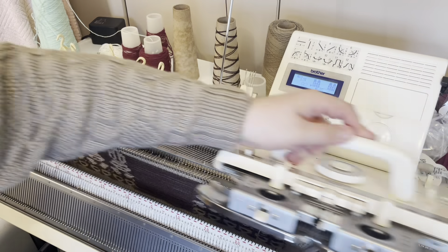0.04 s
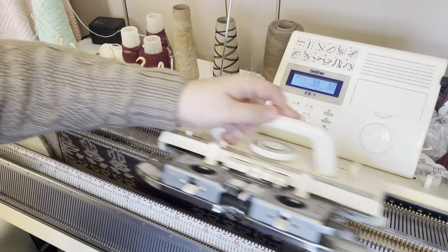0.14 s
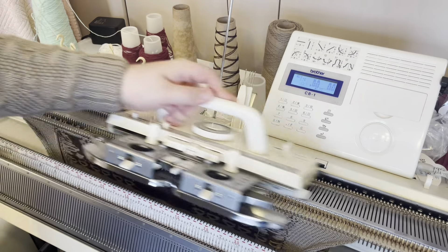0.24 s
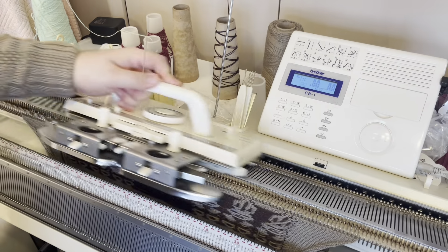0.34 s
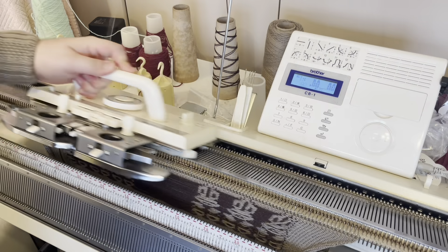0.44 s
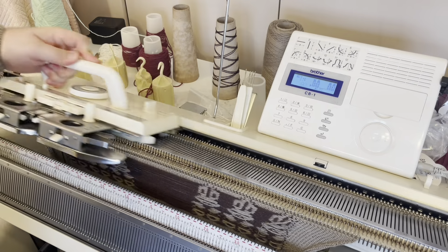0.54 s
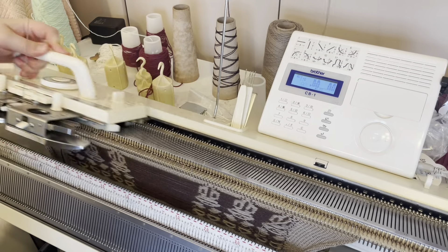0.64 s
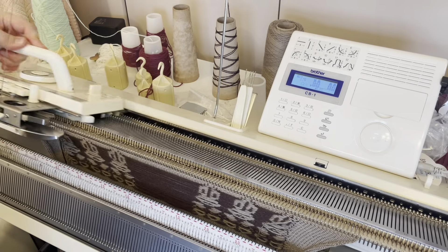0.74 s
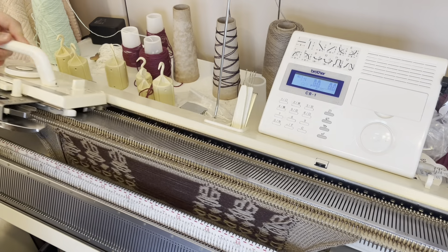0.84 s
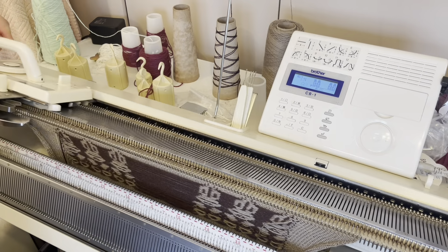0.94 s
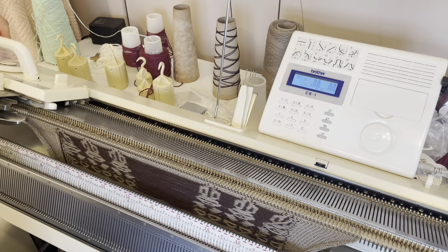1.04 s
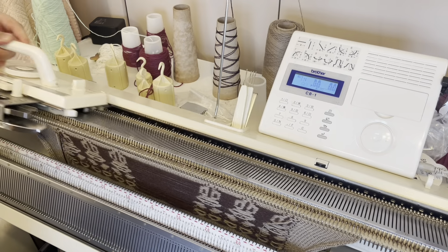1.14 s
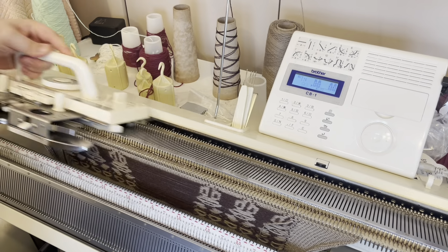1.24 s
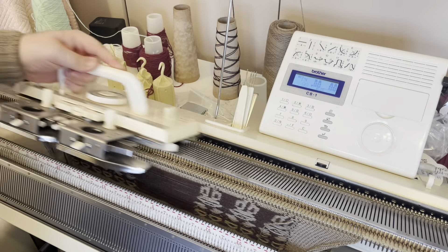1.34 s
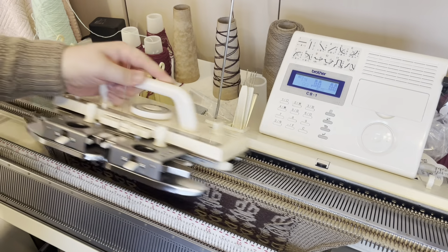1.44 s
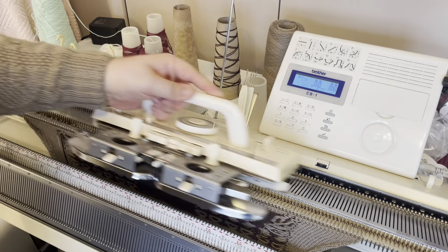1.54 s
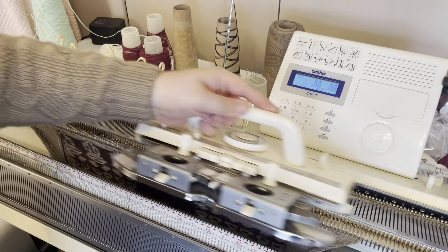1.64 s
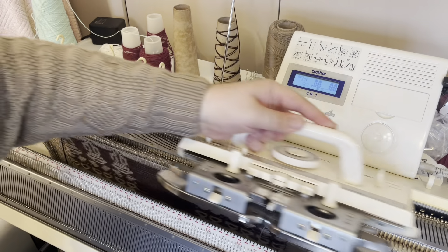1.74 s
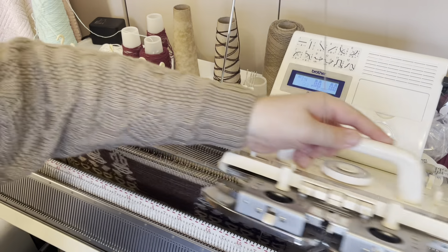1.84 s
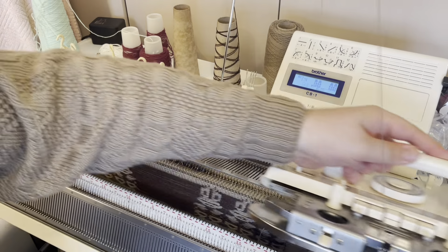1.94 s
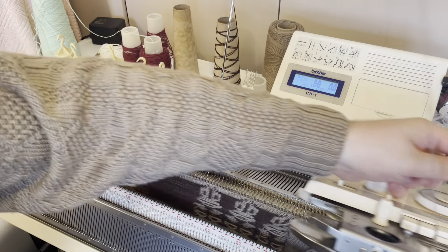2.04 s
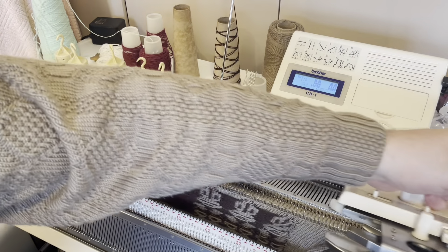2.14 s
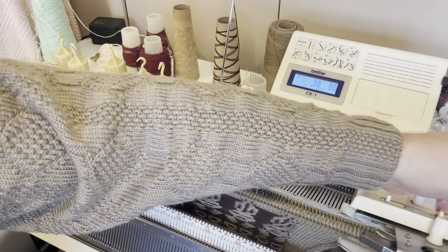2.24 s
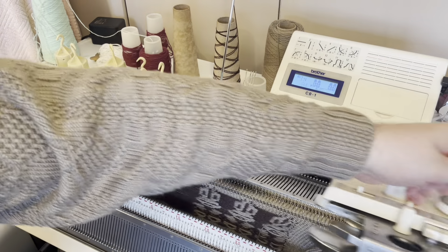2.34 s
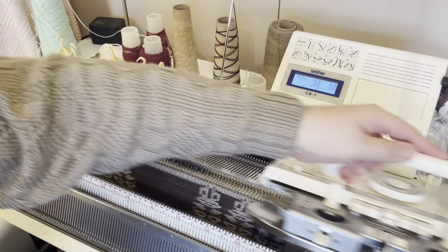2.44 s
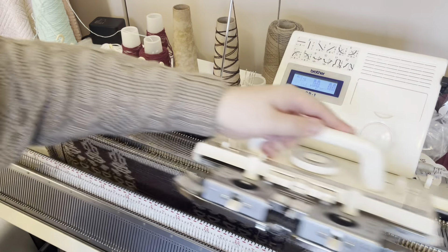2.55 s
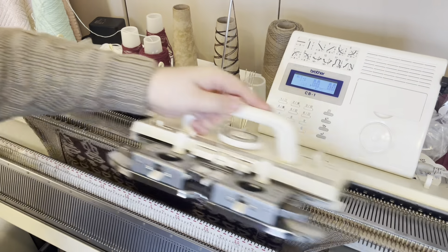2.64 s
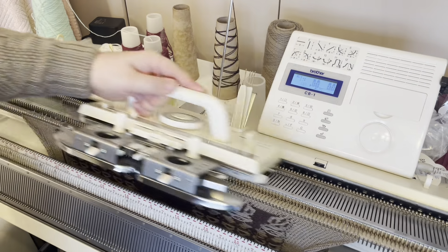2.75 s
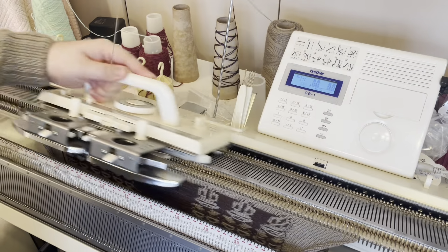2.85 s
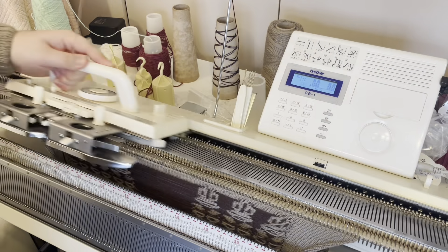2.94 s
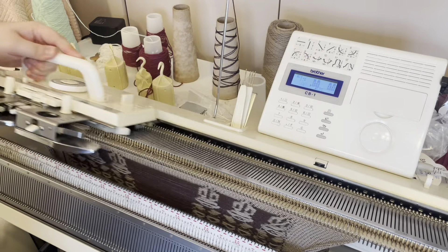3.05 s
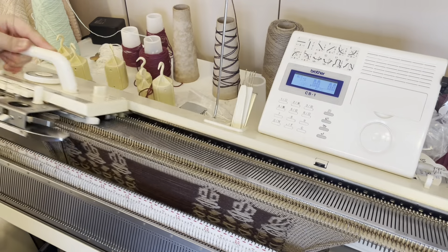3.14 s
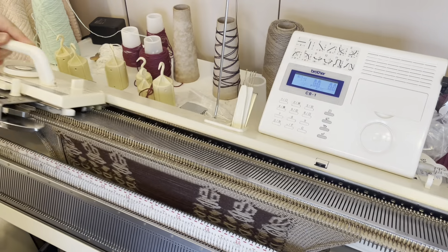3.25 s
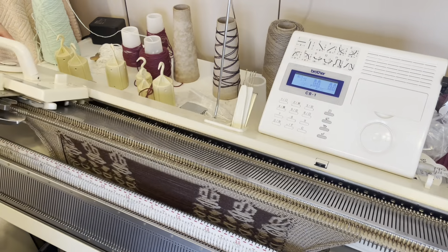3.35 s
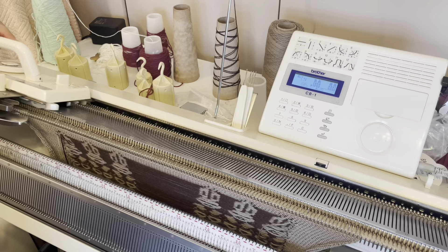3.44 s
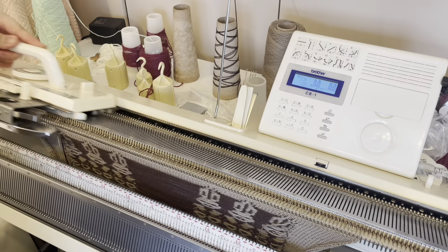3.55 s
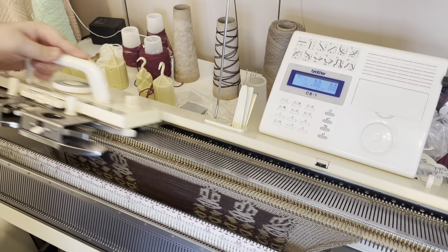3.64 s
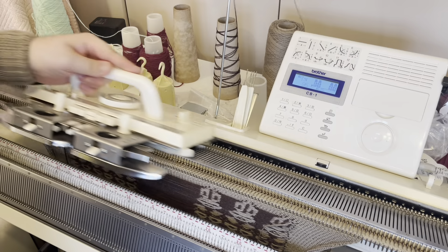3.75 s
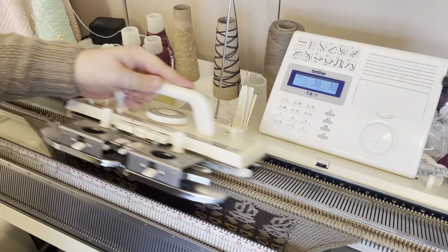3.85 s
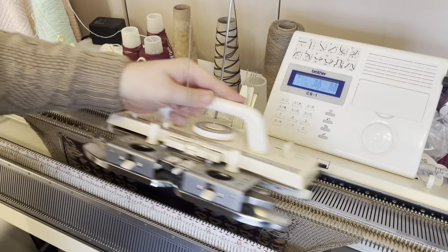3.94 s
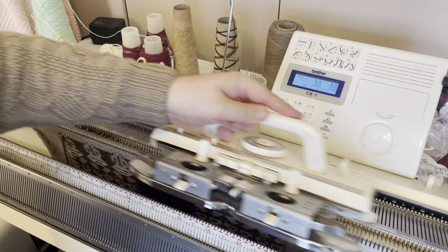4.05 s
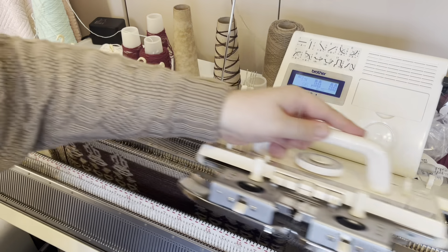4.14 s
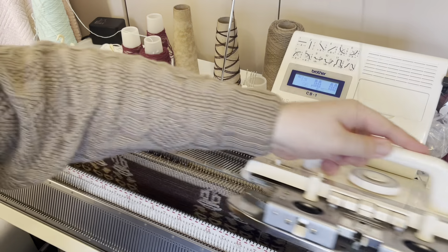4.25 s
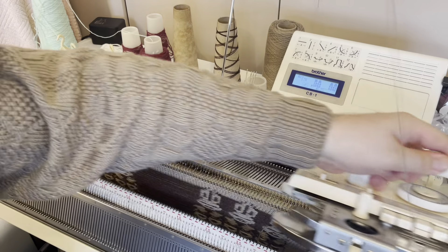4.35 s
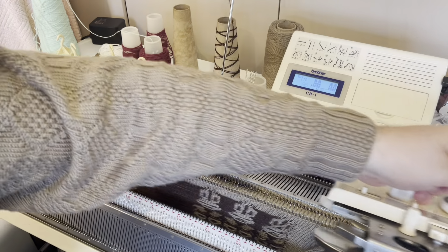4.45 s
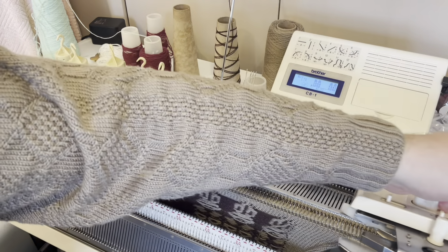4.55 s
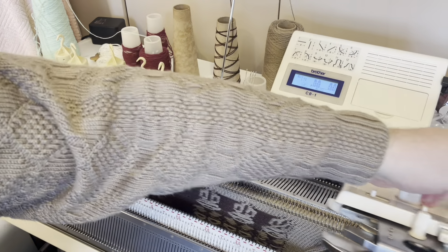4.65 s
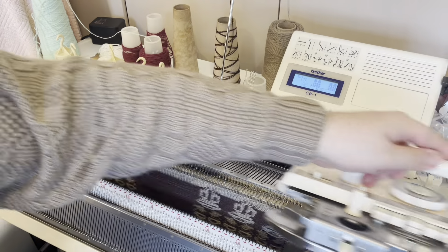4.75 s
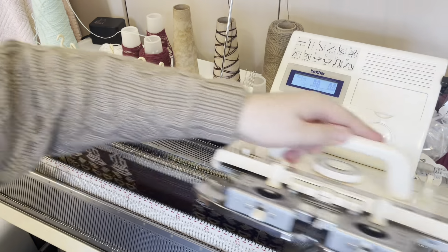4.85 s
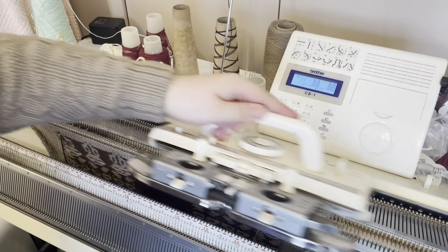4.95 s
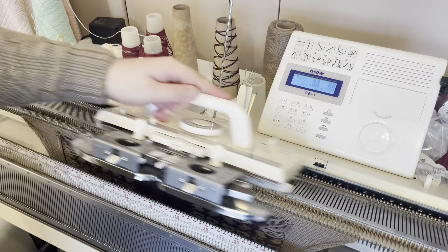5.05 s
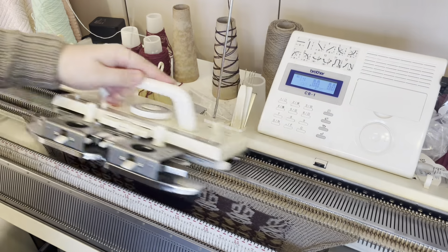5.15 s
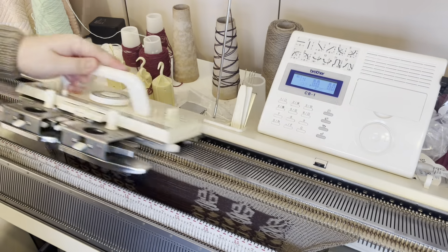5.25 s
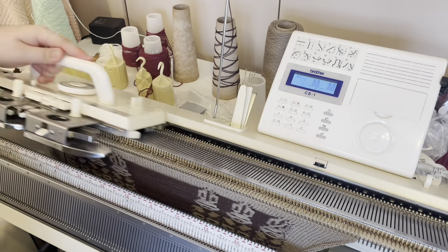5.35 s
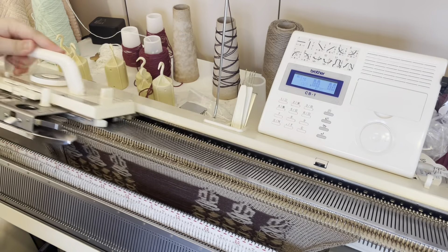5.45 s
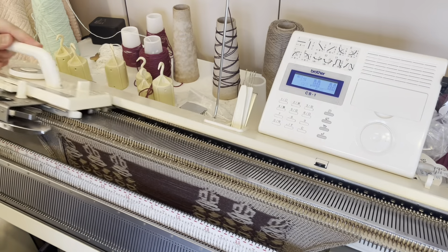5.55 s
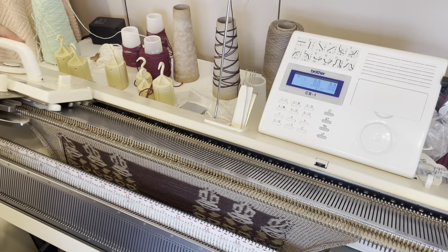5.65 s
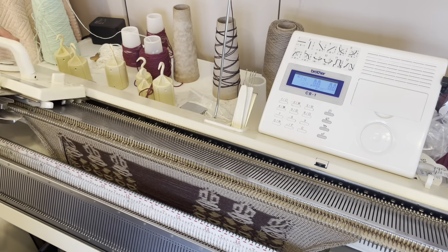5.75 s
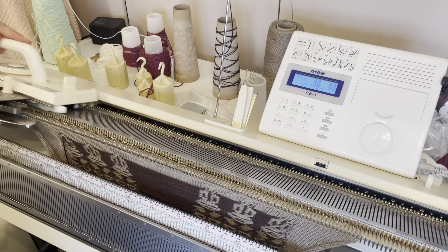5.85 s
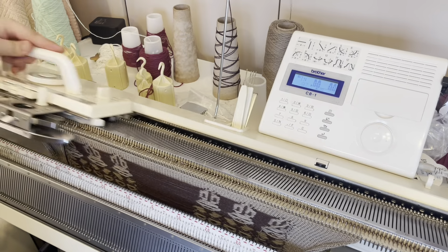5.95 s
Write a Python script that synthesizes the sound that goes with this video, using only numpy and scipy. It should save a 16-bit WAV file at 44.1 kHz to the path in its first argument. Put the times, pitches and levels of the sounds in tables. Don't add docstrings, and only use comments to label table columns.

```python
import sys
import numpy as np
from scipy import signal
from scipy.fft import rfft, irfft, next_fast_len
from scipy.io import wavfile
from scipy.ndimage import uniform_filter1d

SR = 44100
rng = np.random.default_rng(int(sys.argv[2]) if len(sys.argv) > 2 else 0)


def invert_db(x):
    u = np.asarray(x, float) / 20
    return 10 ** u


def inscribe(sig):
    pcm = np.round(np.clip(np.atleast_2d(sig).T, -1, 1) * 32767)
    wavfile.write(sys.argv[1], SR, pcm.astype(np.int16))


N = 265041

# [t/s, level/dB]
PUSH = [
    [(0, -21.5), (.08, -22), (.3, -24), (.6, -28), (.68, -31), (.75, -39.5), (.84, -49.5), (.96, -64)],
    [(1.165, -45.5), (1.185, -34), (1.25, -24), (1.31, -24.5), (1.71, -27), (1.85, -29.5), (1.96, -32),
     (2.05, -44), (2.16, -60)],
    [(2.37, -45.5), (2.46, -28), (2.52, -21), (2.65, -21.5), (2.73, -29), (2.87, -28), (3.15, -35),
     (3.25, -45.5), (3.33, -61)],
    [(3.49, -48), (3.535, -52.5), (3.56, -35.5), (3.61, -26), (3.7, -22.5), (3.95, -26.5), (4.2, -28),
     (4.38, -38.5), (4.45, -54.5)],
    [(4.69, -54), (4.725, -36.5), (4.79, -28), (4.9, -21), (5.0, -23), (5.27, -27), (5.49, -33),
     (5.55, -44), (5.67, -62.5)],
    [(5.822, -67), (5.84, -55), (5.9, -49.5), (5.93, -32.5), (6.01, -26)],
]
# [halt t/s, creeping off t/s, rest level/dB, creep level/dB]
TURNS = [(1.015, 1.061, -78, -63.5), (2.22, 2.325, -68.5, -56), (3.38, 3.451, -68.5, -62),
         (4.577, 4.612, -67, -63), (5.72, 5.765, -75.5, -68)]
# [t/s, needle rate f/Hz, bite of the cams level/dB]
STROKES = [
    [(0, 179, -39), (.09, 199, -40.5), (.27, 210, -40.5), (.36, 188, -48), (.54, 156, -43), (.75, 140, -53)],
    [(1.2, 200, -50), (1.29, 232, -43.5), (1.47, 183, -43.5), (1.56, 186, -41), (1.83, 154, -43),
     (2.0, 140, -47.5)],
    [(2.42, 205, -50.5), (2.55, 236, -36), (2.68, 252, -40), (2.78, 199, -48), (2.96, 163, -51.5),
     (3.15, 146, -48.5)],
    [(3.58, 208, -50), (3.67, 230, -40.5), (3.85, 187, -43.5), (3.94, 183, -44.5), (4.12, 168, -41.5),
     (4.35, 140, -46)],
    [(4.75, 170, -51), (4.84, 239, -39), (5.02, 227, -39.5), (5.2, 187, -48), (5.29, 167, -50.5),
     (5.5, 133, -48.5)],
]
# [f/Hz, level/dB]
BODY_RESPONSE = [(135, -32), (165, 2), (182, 5), (200, -7.5), (228, -8), (270, -10.5), (370, -9),
                 (450, -2.5), (600, -1.5), (740, -9), (960, -0.5), (1250, -10), (1450, -18), (1670, -3),
                 (2100, -15)]

# [f/Hz, level/dB]
HISS = [(5500, -31), (6800, -13.5), (7900, -5), (8800, -7), (10000, -0.5), (11200, -3), (11900, -6.5),
        (12600, -17), (13500, -28), (14250, -46), (14450, -75)]
CLATTER = [(600, -43), (950, -4.5), (1400, -16.5), (2000, -11), (2700, -3), (3250, -3), (3800, -4),
           (5200, -1.5), (6600, -4), (7400, -11.5), (8500, -7)]
RUMBLE = [(130, -16), (200, -4.5), (330, -12.5), (450, 0), (650, 0.5), (830, -3.5), (1050, -7.5),
          (1400, -13), (2000, -11), (2800, -28)]
TABLE = [(20, -36), (40, -19), (65, -17), (95, -2), (130, -20), (170, -0.5), (240, -58)]
# [f/Hz, level/dB]
GLINT = [(14300, -50), (14550, 0), (15750, -1), (15880, -60)]
# [f/Hz, bandwidth/Hz, level/dB]
PLATES = [(410, 18, -58.5), (762, 20, -56.5), (1070, 33, -49), (1680, 130, -71), (3220, 45, -47.5),
          (5130, 29, -47.5), (9030, 190, -30.5), (11140, 280, -27.5)]
# [f/Hz, level/dB]
RUSH_TOP = [(12800, 0), (14300, -4), (14600, -60)]
# [f/Hz, level/dB]
ROOM_TONE = [(25, -21), (60, -23), (100, 9), (220, 16.5), (600, 9), (850, -18), (1500, -24), (4000, -26),
             (12000, -30), (13000, -52)]

# [t/s, table level/dB, carriage level/dB]
KNOCKS = [(0.069, -30, -26.5), (0.786, -40, -38), (1.307, -34.5, -40), (2.039, -43, -37),
          (2.095, -43, -37.5), (2.385, -41, -43), (2.553, -36, -35), (3.207, -38, -36), (3.694, -39, -41),
          (4.42, -44, -40.5), (4.899, -41, -31.5), (5.536, -40, -36.5)]
# [delay t/s, level/dB]
BUMPS = [(-.022, -8), (0, -1), (.019, -6), (.041, -11.5)]
# [f/Hz, level/dB, decay by 60 dB t/s]
KNOCK_MODES = [(94, -16, 0.23), (132, -5, 0.15), (181.3, 3, 0.22), (300, 6, 0.025), (513, 6, 0.056),
               (606, -2, 0.028), (790, -43, .04)]
# [t/s, peak level/dB, pitch f/Hz, dull tap level/dB]
CLICKS = [(0.812, -30, 7696, -59), (0.949, -44, 6010, -67), (1.064, -61, 4376, -43.5),
          (1.115, -44, 8970, -51), (1.1765, -30, 8184, -32), (2.0788, -26.5, 3250, -33),
          (2.27, -59, 2520, -39.5), (2.3367, -40, 9140, -55), (2.3725, -24.5, 3280, -32.5),
          (3.3038, -27.5, 9700, -56), (3.4404, -67, 4380, -42.5), (3.453, -45, 6800, -66),
          (3.485, -42, 8970, -60), (3.5475, -28, 8150, -42), (4.4202, -27.5, 5000, -32),
          (4.469, -48, 8900, -55), (4.49, -41, 6940, -55), (4.608, -58, 9220, -40.5),
          (4.7032, -25.5, 3500, -30.5), (5.77, -59, 4430, -43.5), (5.8334, -40.5, 6400, -66),
          (5.9171, -29, 8500, -45)]
# [f/Hz, level/dB]
CLICK_TOP = [(13000, 0), (14500, -16)]
# [t/s, duration t/s, level/dB]
RING = [(.82, .34, -63), (2.0, 0.2496, -61), (3.24, 0.33, -58), (4.4, 0.19, -61), (5.548, .29, -62)]
# [f/Hz, level/dB]
BED_MODES = [(4310, -11), (4340, -8), (4352, -5), (4374, 3), (4392, -8), (4408, -2), (11750, -5)]
# [f/Hz, left-right likeness, phase lead of the right/rad, left over
# right level/dB]
PORTS = [(100, .99, 0, 0), (250, .93, 0, .5), (600, .62, 0, .3), (1500, .7, .2, 1.0), (3000, .56, -.7, 2.4),
         (4000, .68, -.3, 1.5), (5300, .48, -.5, 3.0), (6300, .68, -.2, 2.2), (7100, .55, -.45, 5.0),
         (7700, .85, -.9, 1.5), (8500, .96, 0, .3), (10220, .998, 3.14, 0), (11780, .999, 6.2, 0),
         (12250, .999, 6.4, 0), (13250, .999, 9.3, 0), (14250, .999, 9.5, 0), (14650, .999, 12.56, 0)]

FULL_PUSH_DB, SET_OFF_S = -24, 0.012
JERK_DB, JERK_GROWS, JERKS_PER_S = 0.35, 0.05, 30
# (level/dB at full push, share of the swing, lag t/s)
CLATTER_LAW, RUMBLE_LAW, TABLE_LAW = (-28.5, 0.86, 0.011), (-35, 0.62, 0.04), (-58.5, 0.29, 0.077)
RUMBLE_SHUDDER_DB, TABLE_SHUDDER_DB, SHUDDER_T60_S = -6.5, -11, 0.083
HUM_DB, HUM_FOLLOWS = -44.5, 0.44
BRIGHT_DB_PER_RATE, USUAL_RATE = 0.06, 203
CLICK_T60_S, RING_FADE_DB_PER_S = 0.024, 36
ROOM_DB, ROOM_T60_S = -61, 0.45


def rms_one(x):
    return x / np.sqrt(np.mean(x ** 2) + 1e-20)


def in_time(rows):
    s, *columns = np.transpose(rows)
    return [np.interp(np.arange(N) / SR, s, c) for c in columns]


def during(spans):
    t = np.arange(N) / SR
    inside = sum(1. * (t >= start) * (t < end) for start, end in spans)
    return uniform_filter1d(inside, size=2001, mode="nearest")


def shaped(x, points, column=1, gain=invert_db):
    size = next_fast_len(N + 4096)
    hz = np.maximum(np.arange(size // 2 + 1) * SR / size, 1)
    table = np.array(points)
    curve = np.interp(np.log(hz), np.log(table[:, 0]), table[:, column])
    return irfft(rfft(x, size) * gain(curve), size)[..., :N]


def flutter(rate):
    r = np.exp(-2 * np.pi * rate / SR)
    slow = signal.lfilter([1], [1, -2 * r, r * r], rng.standard_normal(N + 8000))
    return rms_one(slow[8000:])


def ring(force, hz, t60):
    r, w = invert_db(-60 / (t60 * SR)), 2 * np.pi * hz / SR
    return signal.lfilter([0, np.sin(w)], [1, -2 * r * np.cos(w), r * r], force + 1e-18)


def resonance(force, hz, width):
    r = np.exp(-np.pi * width / SR)
    poles = [1, -2 * r * np.cos(2 * np.pi * hz / SR), r * r]
    return signal.lfilter([(1 - r * r) / 2, 0, (r * r - 1) / 2], poles, force)


def push():
    curve = [row for stroke in PUSH for row in stroke]
    for halt, off, rest, creep in TURNS:
        curve += [(halt, rest), (off, rest), (off + SET_OFF_S, creep)]
    push_db = in_time(sorted(curve))[0] - FULL_PUSH_DB
    jerk_db = JERK_DB + JERK_GROWS * np.clip(-push_db, 0, 35)
    return push_db + jerk_db * flutter(JERKS_PER_S)


def follow(push_db, law):
    level_db, share, lag_s = law
    r = np.exp(-1 / (max(lag_s, .001) * SR))
    gain = invert_db(level_db + share * push_db)
    return signal.lfilter([1 - r], [1, -r], gain, zi=[r * gain[0]])[0]


def shudder(column):
    blows = np.zeros(N)
    blows[[round(row[0] * SR) for row in KNOCKS]] = invert_db(np.array(KNOCKS)[:, column])
    return signal.lfilter([1], [1, -invert_db(-60 / (SHUDDER_T60_S * SR))], blows + 1e-18)


def hum(push_db):
    per_s, bite_db = in_time([row for stroke in STROKES for row in stroke])
    lowest_db = HUM_DB + HUM_FOLLOWS * push_db
    higher_db = bite_db - 2.0 + BRIGHT_DB_PER_RATE * (per_s - USUAL_RATE)
    levels_db = lowest_db, bite_db, higher_db
    needle = np.cumsum(per_s * (1 + 0.00385 * flutter(21.1))) / SR
    body, tone = np.array(BODY_RESPONSE), 0
    for k in range(1, 10):
        body_db = np.interp(np.log(k * per_s), np.log(body[:, 0]), body[:, 1])
        db = body_db + levels_db[min(k // 2, 2)]
        waver = invert_db(db + (1.5 if k == 1 else 5) * flutter(12))
        tone = tone + np.sqrt(2) * waver * np.sin(2 * np.pi * (k * needle + rng.random()))
    strokes = during([(rows[0][0], rows[-1][0]) for rows in STROKES])
    return needle, strokes * tone


def contacts(needle, per_s, spread_db, beat, flutter_db):
    bunch = 1 + np.clip(beat, 0, 1) * np.cos(2 * np.pi * needle)
    bunch = bunch * invert_db(flutter_db * (flutter(64) + flutter(220)))
    hit = rng.random((3, N)) < per_s / SR
    sizes = invert_db(spread_db * np.minimum(rng.exponential(1, (3, N)), 4))
    sizes = sizes * rng.choice([-1, 1], (3, N))
    return bunch * (rms_one(hit * sizes) + 1.07 * rng.standard_normal((3, N)))


def top_glint(fine, push_db):
    glint = 0
    for hz in (14550, 14800, 15050, 15350, 15700):
        on = uniform_filter1d(1. * (flutter(7) + push_db / 22 > .35), size=400)
        tone = rms_one(resonance(resonance(fine[0], hz, 200), hz, 200))
        glint = glint + invert_db(-51 + .6 * push_db) * on * tone
    return shaped(glint, GLINT)


def ringing_parts(coarse, clatter, hiss):
    parts = 0
    for hz, width, db in PLATES:
        drive = clatter if hz < 7000 else hiss * invert_db(-7.5)
        gain = drive * invert_db(db + 28.0 + 3.6 * flutter(6.9))
        parts = parts + gain * rms_one(resonance(coarse, hz, width))
    for hz in np.geomspace(1200, 6800, 16):
        flare = clatter * invert_db(-24 + 5.5 * flutter(9))
        parts = parts + flare * rms_one(resonance(coarse, hz, 60 + hz / 50))
    return parts


def rush(needle, push_db):
    hiss, clatter = invert_db(FULL_PUSH_DB + push_db), follow(push_db, CLATTER_LAW)
    rumble = follow(push_db, RUMBLE_LAW) + invert_db(RUMBLE_SHUDDER_DB) * shudder(column=2)
    table = follow(push_db, TABLE_LAW) + invert_db(TABLE_SHUDDER_DB) * shudder(column=1)
    fine = contacts(needle, 7000, spread_db=0.5, beat=0.024, flutter_db=0.18)
    coarse = contacts(needle, 2000, spread_db=1.0, beat=0.017, flutter_db=-0.38)
    out = hiss * invert_db(2.0) * rms_one(shaped(fine, HISS))
    out += clatter * rms_one(shaped(0.82 * fine + 0.59 * coarse, CLATTER))
    out += rumble * invert_db(-4.5) * rms_one(shaped(coarse, RUMBLE))
    out = shaped(out + ringing_parts(coarse, clatter, hiss), RUSH_TOP)
    out[0] += top_glint(fine, push_db)
    return out + table * invert_db(3.5) * rms_one(shaped(rng.standard_normal((3, N)), TABLE))


def room_tone():
    return invert_db(ROOM_DB) * rms_one(shaped(rng.standard_normal((3, N)), ROOM_TONE))


def knocks():
    rows, out = np.array(KNOCKS), np.zeros(N)
    chance = rng.standard_normal((len(rows), len(KNOCK_MODES), len(BUMPS)))
    for k, (hz, db, t60) in enumerate(KNOCK_MODES):
        struck_db = rows[:, 1 if hz < 250 else 2] + db
        blows = np.zeros(N)
        for j, (late_s, loss_db) in enumerate(BUMPS):
            at = np.round((rows[:, 0] + late_s) * SR).astype(int)
            blows[at] = invert_db(struck_db + loss_db + 2.0 * chance[:, k, j]) * (-1) ** k
        force = signal.lfilter([1], [1, -np.exp(-2.5 * hz / SR)], blows * 5 * hz / SR)
        out += ring(force, hz, t60)
    return signal.lfilter(*signal.butter(2, 70, "high", fs=SR), out)


def clicks():
    length = 8000
    out, t = np.zeros(N + length), np.arange(length) / SR
    noise = rng.standard_normal((len(CLICKS), 2, length))
    bright_fade = (1 - np.exp(-t / 0.00012)) * invert_db(-60 * t / CLICK_T60_S)
    tap_fade = (1 - np.exp(-t / 0.0081)) * invert_db(-60 * t / 0.068)
    for (s, peak_db, hz, low_db), (sharp, dull) in zip(CLICKS, noise):
        pitched = sharp + 1.5 * resonance(sharp, hz, 2500)
        bright = rms_one(signal.lfilter(*signal.butter(2, hz * .55, "high", fs=SR), pitched))
        tap = rms_one(resonance(resonance(dull, 280, 650), 320, 1150))
        snap = invert_db(peak_db + 1.5) * bright_fade * bright + invert_db(low_db + 1.5) * tap_fade * tap
        start = round(s * SR)
        out[start:start + length] += snap
    return shaped(out[:N], CLICK_TOP)


def bed_ring():
    fades = []
    for s, length, db in RING:
        fades += [(s, db), (s + length, db - RING_FADE_DB_PER_S * length)]
    level_db, = in_time(fades)
    t, modes = np.arange(N) / SR, 0
    for hz, db in BED_MODES:
        modes = modes + invert_db(db + 1.5 * flutter(5)) * np.sin(2 * np.pi * (hz * t + rng.random()))
    return during([(s, s + length) for s, length, db in RING]) * invert_db(level_db) * rms_one(modes)


def room(x):
    t = np.arange(SR // 2) / SR
    tails = rng.standard_normal((2, len(t))) * invert_db(-60 * t / ROOM_T60_S) * (t > .003)
    return signal.fftconvolve(x[None], tails / np.sqrt(np.sum(tails[0] ** 2)), axes=1)[:, :N]


def ports(direct, diffuse):
    near = shaped(direct, PORTS, column=1, gain=lambda c: np.sqrt(np.clip(c, 0, 1)))
    far = shaped(diffuse, PORTS, column=1, gain=lambda c: np.sqrt(1 - np.clip(c, 0, 1)))
    left = shaped(near, PORTS, column=2, gain=lambda p: np.exp(-.5j * p)) + far[0]
    right = shaped(near, PORTS, column=2, gain=lambda p: np.exp(.5j * p)) + far[1]
    left = shaped(left, PORTS, column=3, gain=lambda d: invert_db(d / 2))
    right = shaped(right, PORTS, column=3, gain=lambda d: invert_db(-d / 2))
    return np.array([left, right])


def scene():
    push_db = push()
    needle, tone = hum(push_db)
    shower = rush(needle, push_db) + room_tone()
    solid = tone + knocks() + clicks() + bed_ring()
    return ports(shower[0] + solid, shower[1:] + invert_db(-5) * room(solid))


def top_cut(x):
    return signal.sosfilt(signal.butter(12, 15900, fs=SR, output="sos"), x)


def record(dry):
    dry = signal.sosfilt(signal.butter(2, 60, "high", fs=SR, output="sos"), dry)
    dry = signal.sosfilt(signal.cheby2(12, 80, 18000, fs=SR, output="sos"), dry)
    return top_cut(dry)


dry = scene()
out = record(dry)
inscribe(out)
```